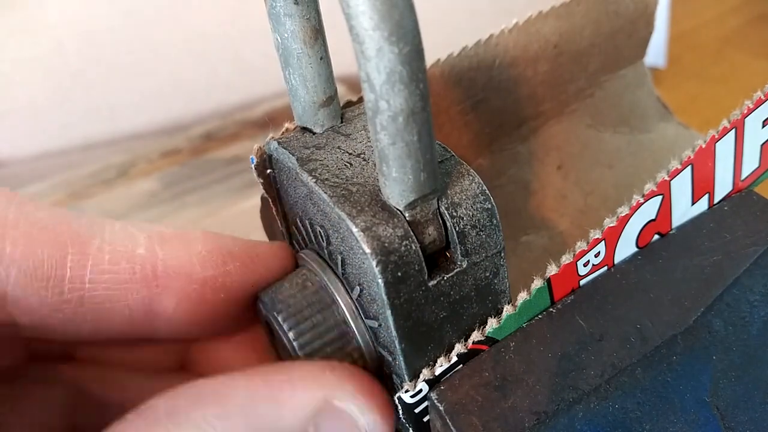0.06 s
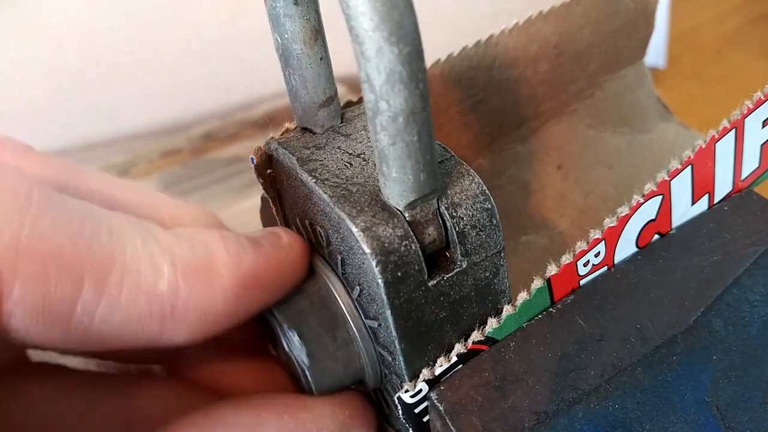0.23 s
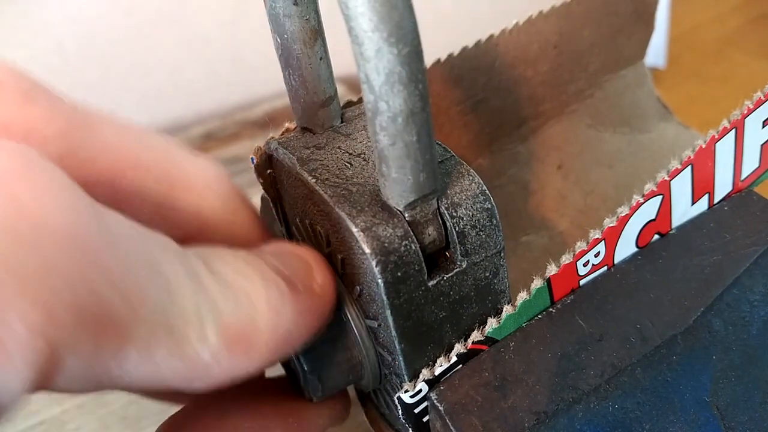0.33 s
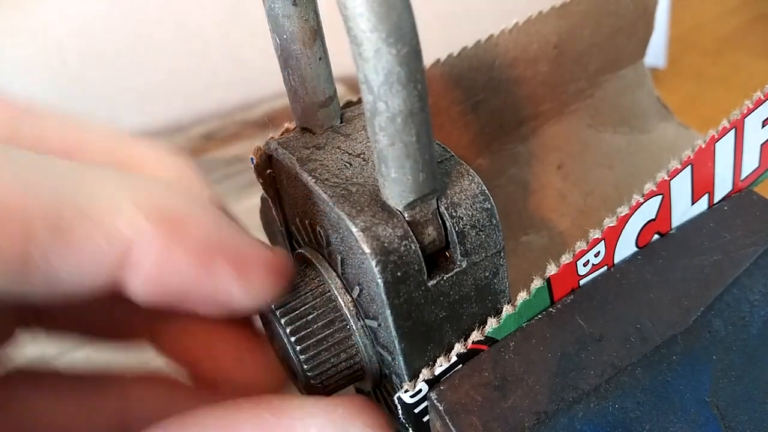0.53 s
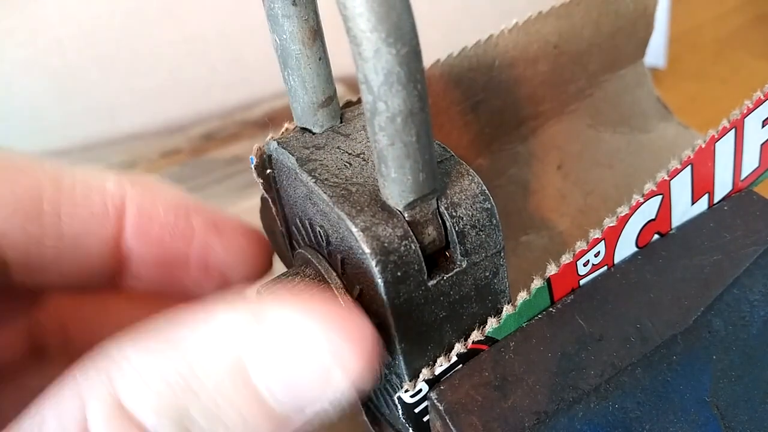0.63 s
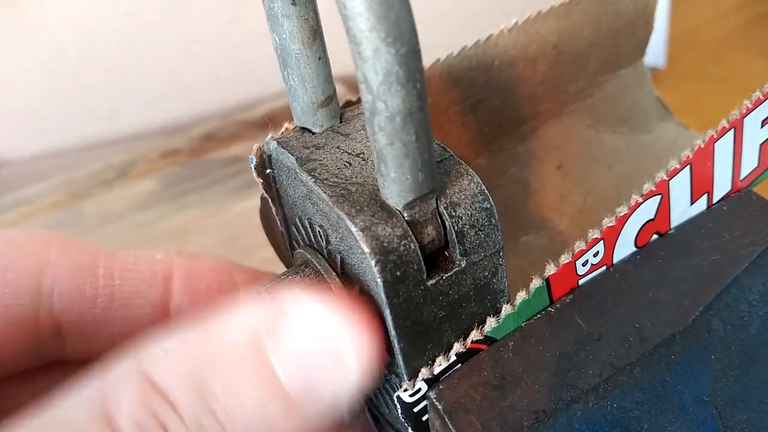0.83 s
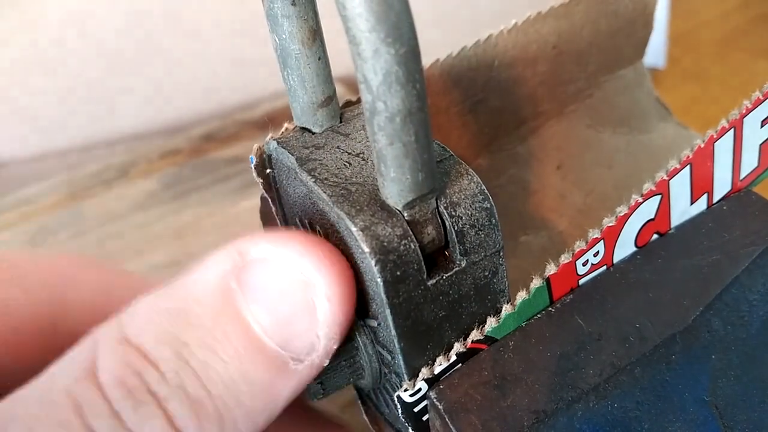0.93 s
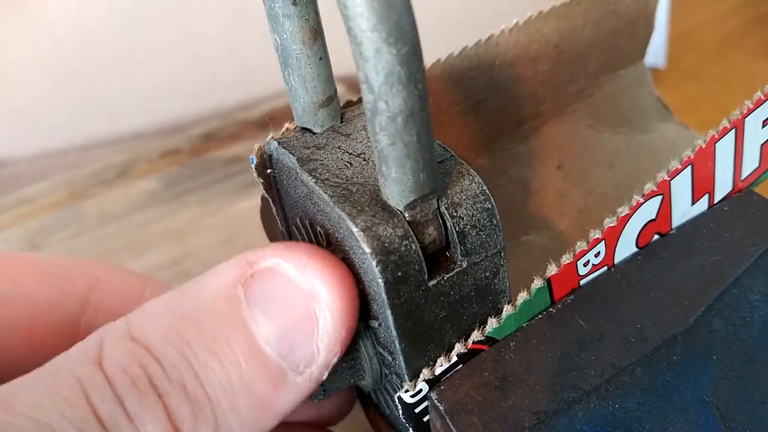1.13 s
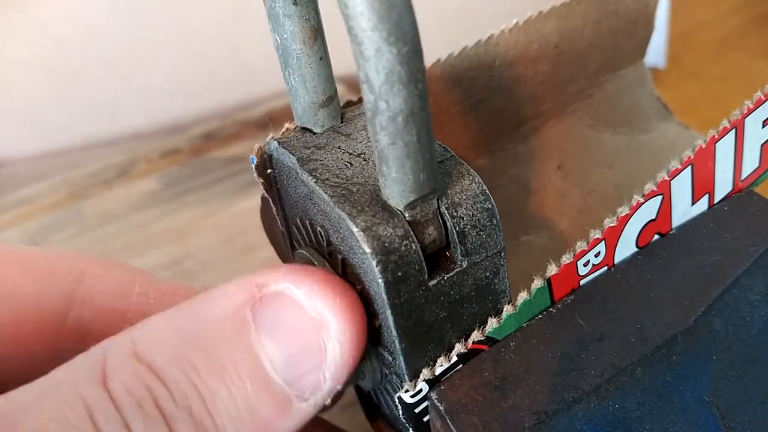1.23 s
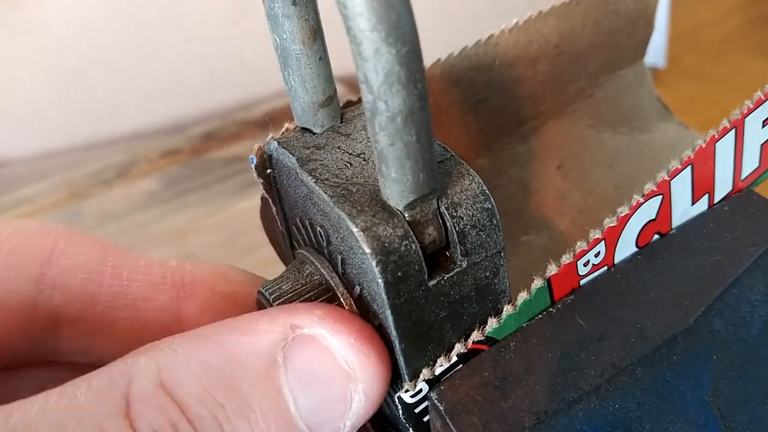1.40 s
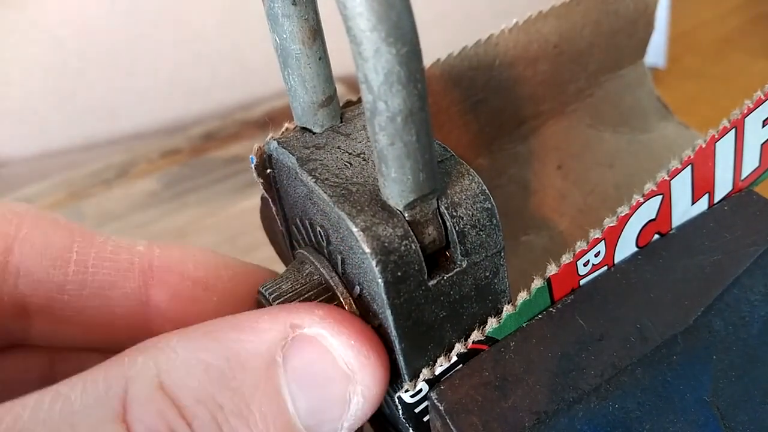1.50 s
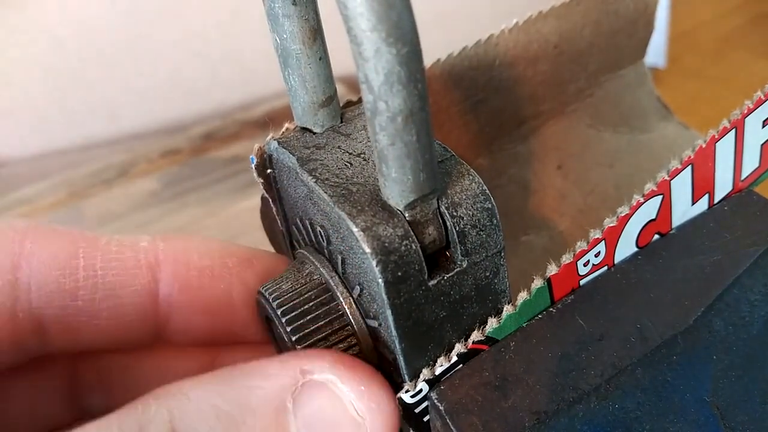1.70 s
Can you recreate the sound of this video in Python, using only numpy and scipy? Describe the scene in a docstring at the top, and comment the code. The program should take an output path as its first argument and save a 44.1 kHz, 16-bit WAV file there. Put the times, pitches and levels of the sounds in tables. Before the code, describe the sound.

A steel padlock knob clicks as fingers turn it, close up in a small room. Three bright snaps come between 0.2 and 0.4 seconds, each with a short knock through the workbench. Small metallic ticks and scuffs follow from about 0.7 to 0.9 seconds. Two more snaps land at 1.3 and 1.4 seconds. Faint skin rubbing and a low hiss run underneath to the end.

```python
"""Fingers work the knob of a steel padlock clamped on a workbench, close up in a small room.
From the start, skin rubs on the knurled knob over a low steady hiss. Three times (0.2-0.4 s) the
mechanism snaps over: a bright steel crack, then a knock as it seats and shakes the bench.
Small parts tick and the fingers scuff; near 0.8 s the level dips briefly.
Two more snaps follow (1.3 and 1.4 s), then a last faint scuff and more rubbing."""
import sys
import numpy as np
from scipy import signal
from scipy.fft import rfft, irfft
from scipy.io import wavfile
from scipy.ndimage import uniform_filter1d

SR = 44100
rng = np.random.default_rng(int(sys.argv[2]) if len(sys.argv) > 2 else 0)


def persist_wave(psi):
    """Save psi, clipped to +-1, as 16-bit WAV."""
    counts = np.round(np.clip(psi, -1, 1) * 32767).astype(np.int16)
    wavfile.write(sys.argv[1], SR, np.atleast_2d(counts).T)


N = 77175
T = np.arange(N) / SR
FREQS = np.maximum(np.arange(N + 1) * SR / (2 * N), 1)
CRACK_RISE_S = 0.00057

# snaps: (time [s], crack [dB], crack tilt [dB/octave], spring release [dB], ping [Hz], ping [dB],
# seating delay [s], knock [dB], knock low-pass [Hz], clack [Hz], clack [dB])
SNAPS = [(0.2163, -33, 1.5, -47.5, 4990, 10, 0.0026, -26, 2030, 1060, -32),
         (0.3049, -30.5, 0.1, -38.5, 3080, 10, 0.0028, -27, 2240, 1210, -30),
         (0.4154, -26, -1.5, -39, 6360, 13.5, 0.002953, -27, 1630, 1130, -24.5),
         (1.3019, -36, -4, -37, 2080, 6.5, 0.00275, -30.5, 810, 810, -27),
         (1.4351, -31, -1, -36, 4750, 10.5, .0031, -27, 2180, 790, -37)]
# knob resonances: (frequency [Hz], level over contact sound [dB], t60 [s])
KNOB_MODES = [(1814, 4.5, 0.028), (2157, 6, 0.042), (2660, 4.5, 0.037), (3767, 19, 0.016), (4710, 11, 0.02),
              (5490, 11.5, 0.016), (6196, 14.5, 0.014), (6520, 3, 0.016), (6940, 8.5, 0.02),
              (7380, 12.5, 0.0072)]


def from_db(db):
    """Decibels to gain."""
    return 10 ** (np.asarray(db) / 20)


def unit_rms(x):
    """Scale to rms 1."""
    return x / np.sqrt(np.mean(x ** 2) + 1e-20)


def gain_curve(points):
    """Gain over time from (time [s], level [dB]) points."""
    return from_db(np.interp(T, *np.transpose(points)))


def envelope(start_s, rise_s, decay_s, hold_s=0):
    """Linear rise, hold, exponential decay."""
    t = T - start_s
    return np.clip(t / rise_s, 0, 1) * np.exp(-np.maximum(t - rise_s - hold_s, 0) / decay_s)


def impulse(time_s, db):
    """A single impact."""
    return from_db(db) * np.maximum(1 - abs(T - time_s) * SR, 0)


def ring(x, hz, t60_s):
    """One damped mode; a unit impulse rings it at height 1."""
    r, w = from_db(-60 / (t60_s * SR)), 2 * np.pi * hz / SR
    return signal.lfilter([1, -r * np.cos(w)], [1, -2 * r * np.cos(w), r * r], x + 1e-18)


def butter(x, hz, kind):
    """Butterworth filter, 12 dB/octave slopes."""
    return signal.sosfilt(signal.butter(2, hz, kind, fs=SR, output="sos"), x)


def colour(x, points, modes=(), tilt_db_per_oct=0):
    """Unit-power filter: a smooth spectrum with resonant peaks on it."""
    hz, db = np.transpose(points)
    gain = from_db(np.interp(np.log(FREQS), np.log(hz), db) + tilt_db_per_oct * np.log2(FREQS))
    peaks = sum(from_db(peak_db) ** 2 / (1 + (2 * np.pi * (FREQS - peak_hz) * t60_s / np.log(1000)) ** 2)
                for peak_hz, peak_db, t60_s in modes)
    cepstrum = irfft(np.log(unit_rms(gain * np.sqrt(1 + peaks))))
    cepstrum[1:N] *= 2  # fold to minimum phase
    cepstrum[N + 1:] = 0
    return irfft(rfft(x, 2 * N) * np.exp(rfft(cepstrum)))[:N]


def grains(per_s, spread_db):
    """Tiny random contacts of uneven strength; rms 1."""
    sizes = from_db(spread_db * np.minimum(rng.exponential(1, N), np.pi))
    signs = rng.choice([-1, 1], N)
    return unit_rms(sizes * signs * (rng.random(N) < per_s / SR))


def rattle(shape, per_s, spread_db):
    """Burst of contacts under an envelope, whitened to drive all pitches alike."""
    x = grains(per_s, spread_db) * shape
    gate = np.minimum(5 * shape / shape.max(), 1)
    for _ in range(2):
        spectrum = rfft(x)
        x = irfft(spectrum / (abs(spectrum) + 1e-12), N) * gate
    return unit_rms(x) * np.sqrt(np.mean(shape ** 2))


def hiss():
    """Low background noise, drifting in level."""
    # hiss spectrum: (frequency [Hz], level [dB])
    spectrum = [(40, -41), (70, -24.5), (130, 0), (340, 3), (600, -4.5), (1400, -12.5), (2500, -19),
                (8800, -23.5), (16000, -40)]
    # drift: (time [s], level offset [dB])
    drift = [(0, -7.5), (.2, 4), (.73, -2), (.775, -8), (.85, -6.5), (1.0, -1.5), (1.55, -0.5), (1.75, 3.5)]
    return from_db(-65) * gain_curve(drift) * colour(rng.standard_normal(N), spectrum)


def rubbing():
    """Fine stick-slip of skin on steel; the fingers damp the knob's ring."""
    # rubbing strength: (time [s], level [dB])
    strength = [(0, -59), (.055, -74.5), (.105, -66.5), (.145, -57), (.21, -58.5), (.28, -53), (.37, -56.5),
                (.46, -50), (.53, -70.5), (.65, -63.5), (.68, -70.5), (.945, -72.5), (.975, -56.5),
                (1.01, -67.5), (1.13, -63.5), (1.19, -65.5), (1.215, -58), (1.26, -68.5), (1.375, -65.5),
                (1.388, -50.5), (1.42, -54.5), (1.52, -66.5), (1.63, -68.5), (1.665, -55), (1.71, -64.5),
                (1.75, -55.5)]
    # skin friction spectrum: (frequency [Hz], level [dB])
    spectrum = [(200, -4.5), (700, 2.5), (1300, 4.5), (2500, 2), (4000, -4), (7400, -2), (8600, -20.5),
                (12000, -30), (16000, -25.5)]
    damped_modes = [(hz, db - 12.5, t60_s) for hz, db, t60_s in KNOB_MODES]
    return colour(gain_curve(strength) * grains(per_s=4400, spread_db=3.5), spectrum, damped_modes)


def spring_releases():
    """The spring lets go: a sharp noise edge at the start of each snap."""
    # release spectrum: (frequency [Hz], level [dB])
    spectrum = [(2000, -40), (7500, 7), (8700, -12), (10200, 2), (11800, -14), (16000, -33)]
    shape = sum(from_db(release_db) * envelope(time_s, CRACK_RISE_S, decay_s=0.0014)
                for time_s, _, _, release_db, *_ in SNAPS)
    return colour(shape * rng.standard_normal(N), spectrum)


def cracks():
    """Steel parts rattle over the detent; the lock rings and one part pings."""
    # steel contact spectrum: (frequency [Hz], level [dB])
    spectrum = [(60, -40), (300, -11.5), (1200, 1.5), (1800, -3.5), (3200, 3.5), (4000, 0.5), (5000, 2.5),
                (7600, -0.5), (8700, -14), (10400, -13.5), (12000, -26), (16000, -26)]
    # lock resonances: (frequency [Hz], level over contact sound [dB], t60 [s])
    lock_modes = [(1845, 16.5, .05), (2397, 11, 0.048), (2830, -6, 0.13), (3210, 7.5, 0.043),
                  (6420, 9.5, 0.02), (7530, 11, 0.021)]
    ping_t60_s = 0.013
    steel = 0
    for time_s, crack_db, tilt_db_per_oct, _, ping_hz, ping_db, *_ in SNAPS:
        shape = envelope(time_s, CRACK_RISE_S, decay_s=0.0041, hold_s=0.00079)
        contacts = rattle(shape, per_s=12000, spread_db=3.5)
        modes = lock_modes + [(ping_hz, ping_db, ping_t60_s)]
        steel += from_db(crack_db) * colour(contacts, spectrum, modes, tilt_db_per_oct)
    return steel


def knocks():
    """The parts seat with a clack and shake the bench; its top throws back an echo."""
    # clamp and bench modes: (frequency [Hz], level [dB], t60 [s])
    bench_modes = [(136.1, -16.5, 0.27), (300, -18.5, 0.017), (345, -11.5, 0.07), (399.4, -6.5, 0.07),
                   (519.3, -14, 0.085), (556.3, -14.5, 0.077), (620.6, -10.5, 0.08), (731, -16.5, 0.13),
                   (854, -23.5, 0.086), (872.5, -14.5, 0.086), (1055, -14.5, 0.15), (1138.4, -12, 0.083),
                   (1250, -25, 0.1), (1411, -21, 0.046)]
    highpass_hz, echo_s, echo_db = 256, 0.003526, -13
    body = 0
    for time_s, *_, seat_s, knock_db, lowpass_hz, clack_hz, clack_db in SNAPS:
        blow = impulse(time_s + seat_s, knock_db)
        bench = sum(from_db(db) * ring(blow, hz, t60_s) for hz, db, t60_s in bench_modes)
        clack = ring(impulse(time_s + seat_s, clack_db), clack_hz, t60_s=0.023)
        body += butter(butter(clack + bench, highpass_hz, "high"), lowpass_hz, "low")
    return body + from_db(echo_db) * np.interp(T - echo_s, T, body)


def scuffs():
    """Short runs of contacts on the knurling ring the knob: bright ticks, dull gritty scrape."""
    # ticks and scuffs: (time [s], level [dB], rise [s], decay [s], scrape relative to tick [dB])
    touches = [(0.4529, -38.5, 0.0014, 0.0019, -3), (0.6966, -39, 0.0026, 0.0075, -30),
               (0.7006, -33.5, 0.0021, 0.0024, -20.5), (0.7673, -52.5, 0.00036, 0.0024, -1),
               (0.824, -43, 0.0052, 0.0047, -24), (.844, -45, 0.0011, 0.0095, -3.5),
               (0.852, -47, 0.0071, 0.021, 1), (0.8892, -56.5, 0.0047, 0.0098, 8.5),
               (1.147, -50, .006, .012, 3.5), (1.395, -51.5, 0.0036, 0.0083, -8),
               (1.4281, -43, 0.0012, .005, -5), (1.553, -61.5, 0.0019, 0.005, 2)]
    # tick spectrum: (frequency [Hz], level [dB])
    tick_spectrum = [(300, -15.5), (1500, -27), (2400, -4.5), (4400, -8), (6800, 2.5), (8000, -0.5),
                     (9000, -9), (16000, -34)]
    # scrape spectrum: (frequency [Hz], level [dB])
    scrape_spectrum = [(200, -16), (800, -12), (1400, 1), (2050, 2.5), (3700, -11), (6000, -8.5),
                       (8000, -24), (14000, -48)]
    ticks, scrapes = 0, 0
    for time_s, db, rise_s, decay_s, scrape_db in touches:
        shape = from_db(db) * envelope(time_s, rise_s, decay_s)
        ticks += rattle(shape, per_s=11000, spread_db=5.5)
        scrapes += from_db(scrape_db) * rattle(shape, per_s=2600, spread_db=5.5)
    return colour(ticks, tick_spectrum, KNOB_MODES) + colour(scrapes, scrape_spectrum, KNOB_MODES)


def room(x):
    """Diffuse reflections: quick build-up, separate decay in each octave."""
    # room tail: (frequency [Hz], level [dB], t60 [s])
    reverb = [(162, -7.5, 0.56), (373, -11, 0.26), (1070, -9.5, 0.083), (2830, -7, 0.076),
              (6050, -26, 0.18), (13800, -9, 0.087)]
    hz, db, t60_s = np.transpose(reverb)
    edges_hz = np.geomspace(70, 18000, 9)
    tail = 0
    for low_hz, high_hz in zip(edges_hz, edges_hz[1:]):
        log_centre = np.log(low_hz * high_hz) / 2
        decay_s = np.interp(log_centre, np.log(hz), t60_s) / np.log(1000)
        gain = from_db(np.interp(log_centre, np.log(hz), db))
        spectrum = rfft(rng.standard_normal(N) * envelope(0, rise_s=0.0024, decay_s=decay_s), 2 * N)
        local_power = uniform_filter1d(abs(spectrum) ** 2, size=80)
        flat = irfft(spectrum / np.sqrt(local_power))[:N]  # no ringing tones
        band = butter(flat, [low_hz, high_hz], "band")
        tail += gain * band * np.sqrt(2 * (high_hz - low_hz) / SR / np.sum(band ** 2))
    return signal.fftconvolve(x, tail)[:N]


def scene():
    """Lock and fingers in the room, over the hiss; mono."""
    # overall gain with a brief dip: (time [s], level [dB])
    dip = [(.77, -1.5), (.802, -6.5), (.818, -11.5), (.826, -0.5)]
    snaps = cracks() + knocks()
    fingers = scuffs()
    background = hiss()
    reflections = room(from_db(4.5) * snaps + from_db(3.0) * fingers)
    mix = snaps + fingers + background + reflections + rubbing() + spring_releases()
    return (gain_curve(dip) * mix)[None]


def record(dry):
    """The microphone sheds the deep bass; the top is cut steeply."""
    bass_cut_hz, stopband_hz = 50, 16350
    thinned = butter(dry, bass_cut_hz, "high")
    return signal.sosfilt(signal.cheby2(16, 60, stopband_hz, fs=SR, output="sos"), thinned)


dry = scene()
out = record(dry)
persist_wave(out)
```